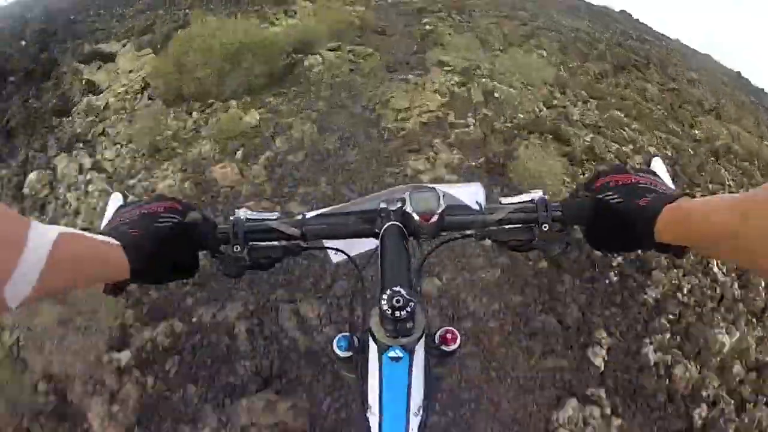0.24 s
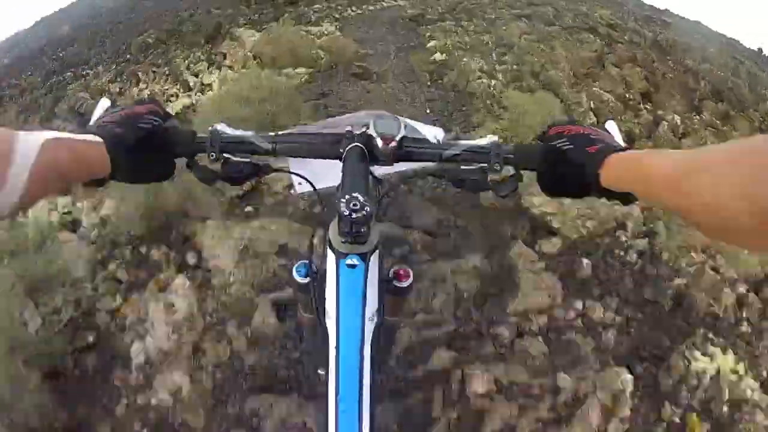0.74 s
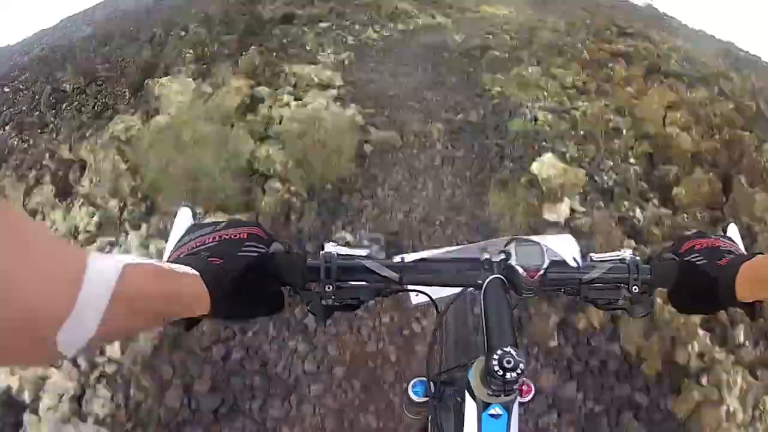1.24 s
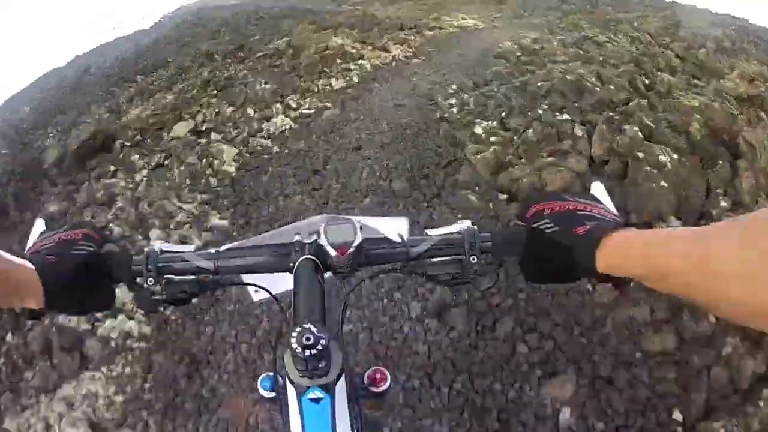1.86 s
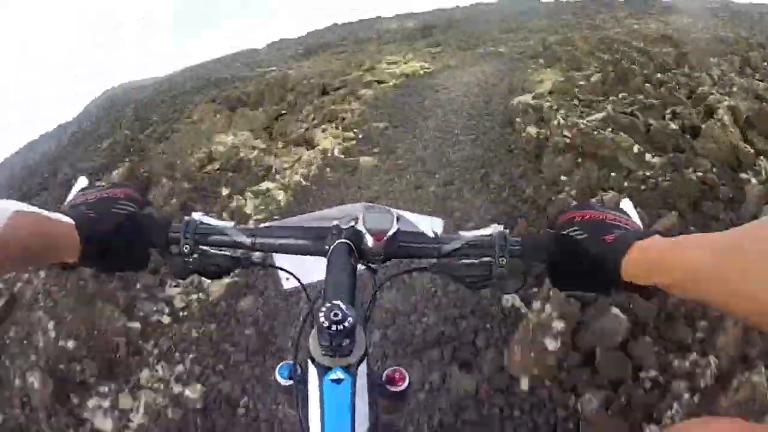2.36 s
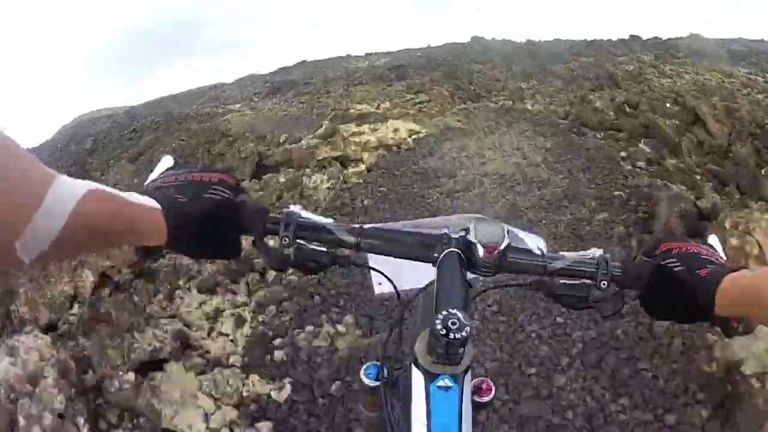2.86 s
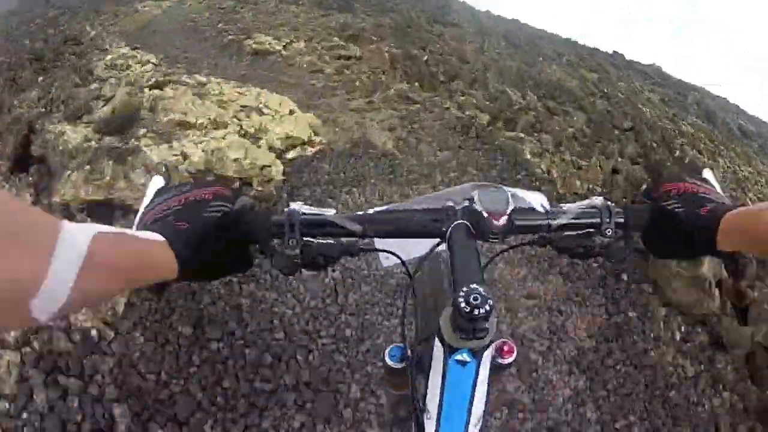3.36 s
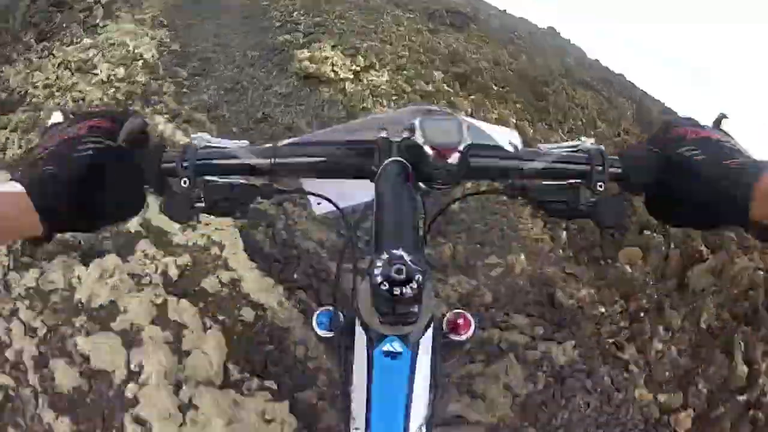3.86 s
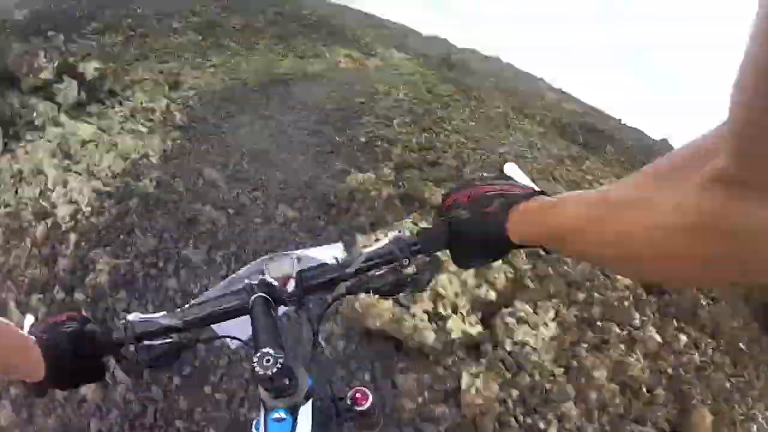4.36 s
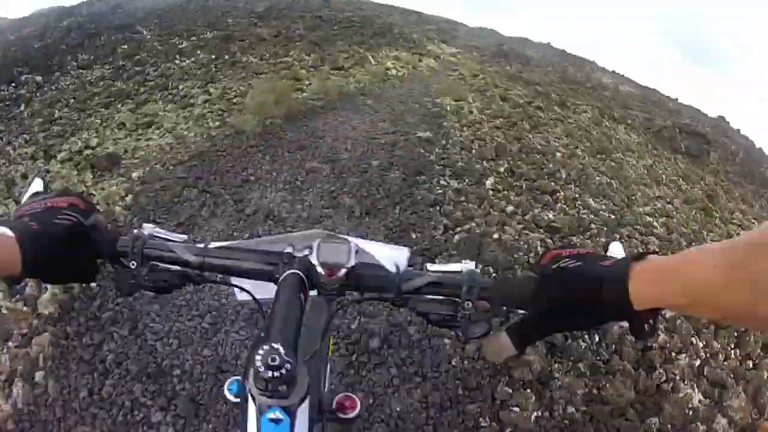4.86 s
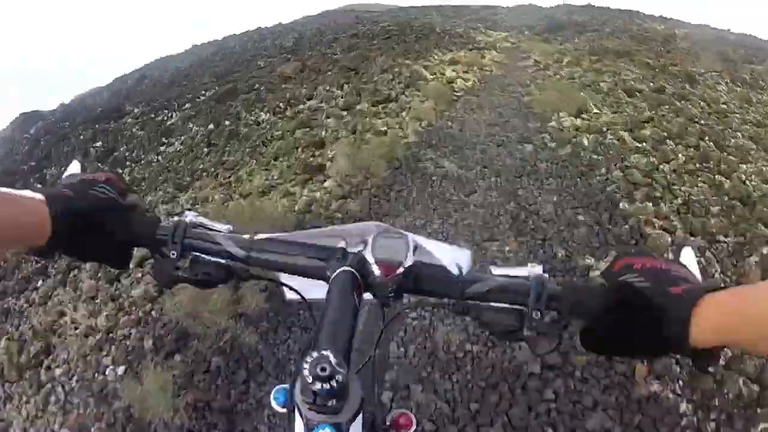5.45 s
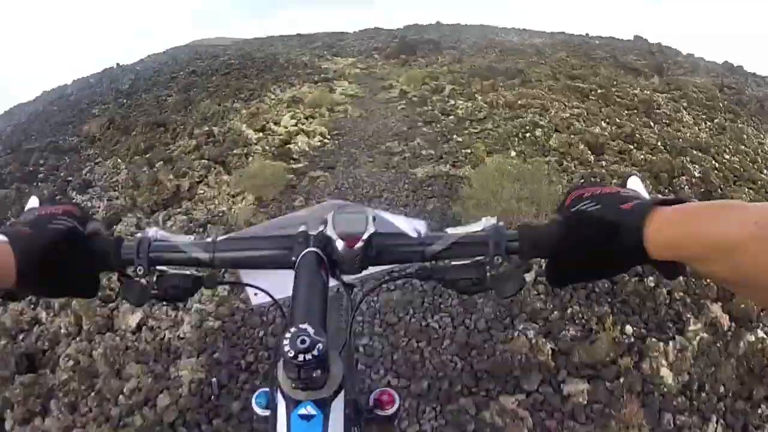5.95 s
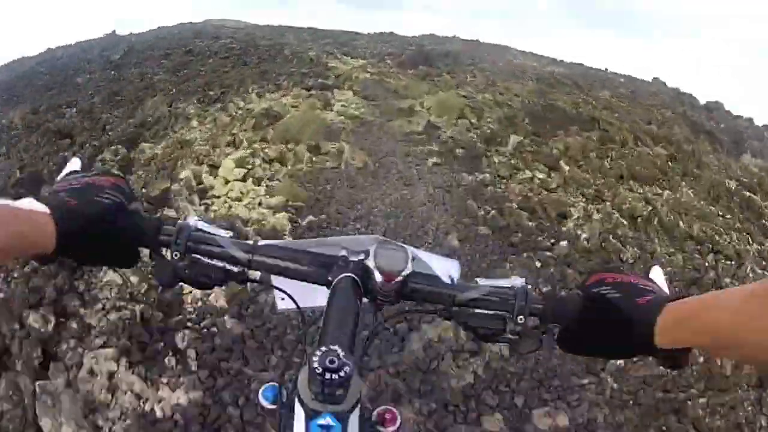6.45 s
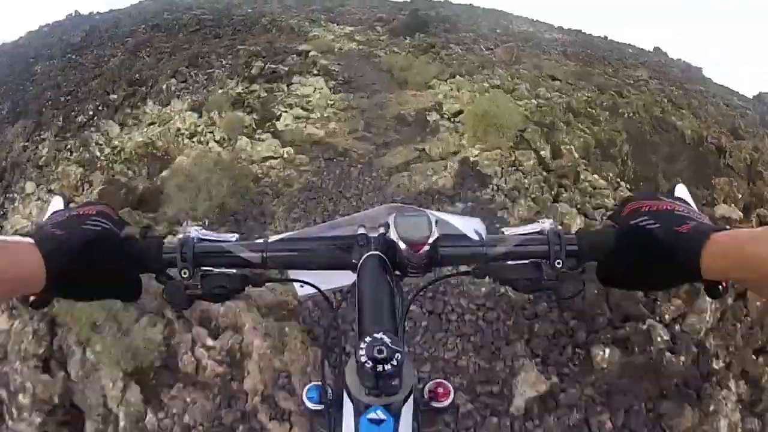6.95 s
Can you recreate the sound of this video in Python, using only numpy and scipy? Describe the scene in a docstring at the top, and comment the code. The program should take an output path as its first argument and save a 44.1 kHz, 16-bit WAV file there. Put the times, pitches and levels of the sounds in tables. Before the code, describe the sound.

A mountain bike runs over loose volcanic gravel, heard from inside a sealed camera case on the rider's chest. From the start a muffled, lumpy wind rumble buffets the microphone over faint grit and scattered knocks, with hard jolts near 0.3, 0.7 and 1.0 seconds. Between 1.0 and 1.7 a few dull thumps stand out, with fewer stones. From 1.75 the crunch brightens and clacks crowd together, with a very sharp crack at 2.0 and dense rattling until 2.5. Heavy wind and low thuds return around 2.6 to 3.2. After 3.5 the rumble turns patchier, exposing gritty scrabbling and chattering stones. Bright knocks cluster from 4.9 to 6.0, and more hard hits land around 6.6 to 6.9. The ride continues to the end at about 7.2 seconds, dry, boxy and coarse, with overloaded peaks.

```python
"""Mountain bike on loose gravel

A mountain bike rolls over loose lava gravel, heard by a cased camera strapped to the rider's chest.
Wind rumble is banded noise and jolts are short decaying sines; both can overload the input.
Crunching grit, scrabbling tyre knobs and knocking stones are noise bursts that ring the case's modes.
The recorder samples at 12 kHz and holds each sample, which mirrors the whole sound around 12 kHz."""
import sys
import numpy as np
from scipy import signal
from scipy.fft import rfft, irfft, next_fast_len
from scipy.io import wavfile
from scipy.ndimage import uniform_filter1d, minimum_filter1d

SR = 44100
rng = np.random.default_rng(int(sys.argv[2]) if len(sys.argv) > 2 else 0)


def dump_mix(stems):
    """Bounce the given channels to the path in sys.argv[1] as a 16-bit WAV at rate SR."""
    frames = np.atleast_2d(stems).T  # one column per channel
    limited = np.clip(frames, -1, 1)  # hard clip at full scale
    pcm = np.round(limited * 32767).astype(np.int16)
    wavfile.write(sys.argv[1], SR, pcm)


N = 317512


def from_db(db):
    """Decibels to gain."""
    return 10 ** (np.asarray(db) / 20)


def rms_one(x):
    """Scale to rms 1."""
    return x / np.sqrt(np.mean(x ** 2) + 1e-20)


def in_time(rows):
    """Turn each level column of a time curve into one value a sample."""
    s, *columns = np.transpose(rows)
    return [np.interp(np.arange(N) / SR, s, c) for c in columns]


def double_lowpass(x, r):
    """Two equal one-pole low-passes in a row: an impulse swells, then dies away."""
    return signal.lfilter([1], [1, -2 * r, r * r], x)


def drift(rate_hz):
    """Slow random movement of rms 1: low-passed noise, drawn at every 20th sample."""
    r = np.exp(-2 * np.pi * rate_hz * 20 / SR)
    slow = double_lowpass(rng.standard_normal(N // 20 + 2002), r)[2000:]   # settled part only
    return np.interp(np.arange(N) / 20, np.arange(len(slow)), rms_one(slow))


def resonance(x, hz, width_hz):
    """A two-pole resonance with gain 1 on top."""
    r = np.exp(-np.pi * width_hz / SR)
    b = np.array([1, 0, -1]) * (1 - r * r) / 2
    a = [1, -2 * r * np.cos(2 * np.pi * hz / SR), r * r]
    return signal.lfilter(b, a, x + 1e-18)


def mode_column():
    """The case's mode frequencies in Hz, one row a mode."""
    return np.array(CASE)[:, :1]


# wind on the case: t/s, relative level/dB of the bands below 288 Hz, of the bands above
WIND_LEVELS = [(0.0, -18, -23), (0.04, -8, -20.5), (0.12, -15.5, -23), (0.26, -7.5, -20),
               (0.3, -20.5, -22.5), (0.4, -18, -20.5), (0.56, -25, -28), (0.6, -7.5, -18.5),
               (0.82, -9.5, -17.5), (0.94, -4, -10), (0.96, -14.5, -21.5), (1.58, -7, -16.5),
               (1.7, -15.5, -26.5), (1.8, -14, -21), (2.09, -16.5, -22), (2.63, -7, -18.5),
               (2.73, -13, -19.5), (2.77, -5.5, -18), (3.15, -10, -20), (3.19, -9.5, -23), (3.55, -8, -16),
               (3.95, -22, -28), (4.01, -14, -22), (4.31, -21.5, -25), (4.39, -19, -20), (4.45, -25, -23),
               (4.71, -16, -23), (4.89, -27.5, -25), (5.07, -11.5, -20.5), (5.19, -30, -26.5),
               (5.65, -14.5, -23.5), (6.19, -23.5, -27), (6.28, -13.5, -24), (6.78, -20, -21.5),
               (6.86, -19, -25), (6.9, -15, -22), (6.94, -16.5, -22.5), (7.2, -23, -21)]
# spectrum of the wind noise: f/Hz, relative density level/dB (per Hz)
WIND_SPECTRUM = [(12, -38), (20, -10.5), (71, 0.5), (134, -2), (237, -7.5), (288, -5), (528, -16),
                 (675, -14), (1000, -28.5), (1300, -63), (2200, -120)]
SPLIT_HZ = 250   # a band that starts at or above this is upper rumble
RUMBLE_CUT_HZ = 777


def rumble(lumps_db, patchy_db, bumps_per_s, bumps_db, gust_tilt):
    """Wind pressure as third-octave noise and bumps: lumps swell all bands, each also flickers alone."""
    level_db, upper_db = in_time(WIND_LEVELS)
    hz, density_db = np.transpose(WIND_SPECTRUM)
    bumps = rms_one(rng.standard_normal(N + SR) * (rng.random(N + SR) < bumps_per_s / SR))
    source = rng.standard_normal((2, N + SR)) + from_db(bumps_db) * bumps
    lumps = drift(18.4)
    low_part, upper_part = np.zeros((2, N))
    edges = 18 * 2 ** (np.arange(18) / 3)
    for k, (low, high) in enumerate(zip(edges, edges[1:])):
        bandpass = signal.butter(3, [low, high], "band", fs=SR, output="sos")
        band = signal.sosfilt(bandpass, source[k % 2])[SR:]   # neighbouring bands use separate noise
        band_db = np.interp(np.log(low * high) / 2, np.log(hz), density_db)
        if low >= SPLIT_HZ:   # strong gusts weigh the upper rumble towards its low end
            band_db = band_db - gust_tilt * (level_db - level_db.mean()) * np.log2(low / 400)
        part = upper_part if low >= SPLIT_HZ else low_part
        part += band * from_db(band_db + lumps_db * lumps + patchy_db * drift(4.5))
    # the sealed case passes little above the cut
    sealed = signal.sosfilt(signal.butter(4, RUMBLE_CUT_HZ, fs=SR, output="sos"), upper_part)
    return from_db(level_db) * rms_one(low_part) + from_db(upper_db) * rms_one(sealed)


# gravel under the tyres: t/s, relative level/dB at 3 kHz, brightness (dB per octave)
GRAVEL = [(0, -33.5, -4), (.36, -37, -2.5), (.56, -30, -0.5), (1.04, -33, 0), (1.3, -36.5, -5.5),
          (1.8, -35.5, 0), (1.84, -28, 1), (2.2, -25.5, 1), (2.51, -25.5, 0), (2.55, -32.5, -2),
          (2.92, -30.5, -1), (2.96, -24.5, -1), (3.25, -31, 5.5), (3.4, -31.5, 1), (3.58, -29.5, 4),
          (3.62, -30, 1), (3.81, -31, 6), (3.89, -40, 3), (4.07, -33.5, -1), (4.11, -40.5, -3.5),
          (4.3, -33.5, -4), (4.33, -28.5, 1.5), (4.85, -31, -3.5), (4.97, -37, 1), (5.01, -26, 1.5),
          (5.17, -30, -1.5), (5.37, -35, 0), (5.43, -30.5, 0.5), (5.49, -38, 4), (5.57, -29, -2),
          (5.79, -34, 2), (5.85, -29, 3.5), (6.4, -40, -3), (6.42, -30.5, 5), (6.5, -35, -0.5),
          (6.78, -28, -3), (6.97, -33.5, 2), (6.99, -32.5, 0), (7.2, -34, -1)]


def crunch(per_s, spread_db, crack_s, clump_db, hiss_db, focus_octaves):
    """Grit cracks clump over a faint hiss; each has its own pitch and favours the modes near it."""
    level_db, bright_db = in_time(GRAVEL)
    octave = np.log2(mode_column() / 3000)
    at = np.flatnonzero(rng.random(N) < per_s / SR)
    sizes = from_db(spread_db * np.minimum(rng.exponential(1, N), 3))[at]
    pitch = rng.uniform(octave.min(), octave.max(), N)[at]   # octaves from 3 kHz
    cracks = np.zeros((len(CASE), N))
    cracks[:, at] = sizes * np.exp(-.5 * ((octave - pitch) / focus_octaves) ** 2)
    swells = double_lowpass(cracks + 1e-18, np.exp(-1 / (crack_s * SR)))
    clumps = from_db(clump_db * drift(35.0) + 2.9 * drift(3.4))
    envelope = rms_one(swells * clumps) + from_db(hiss_db)
    return from_db(level_db + bright_db * octave) * envelope * rng.standard_normal((len(CASE), N))


def scrabble(level_db, per_s, tilt_db):
    """Tyre knobs scrabble without pause: fine random clicks into every mode of the case."""
    clicks = rng.standard_normal((len(CASE), N)) * (rng.random(N) < per_s / SR)
    tilt = tilt_db * np.log2(mode_column() / 3000)   # dB per octave
    return from_db(level_db + tilt + 2.1 * drift(19.0)) * rms_one(clicks)


# modes of the case: f/Hz, width of the narrower of two resonances (Hz), relative level/dB
CASE = [(1060, 162, 2), (1420, 1250, -18), (1844, 440, -1.5), (2280, 300, -3.5), (2837, 394, 2),
        (3735, 490, -1), (4503, 750, 1.5), (4810, 610, 0.5)]


def ring_case(drive):
    """Each mode rings its own drive through a narrow and a wide resonance at one frequency."""
    ringing = np.zeros(N)
    for x, (hz, width_hz, db) in zip(drive, CASE):
        narrow = resonance(x, hz, width_hz)
        ringing += from_db(db) * resonance(narrow, hz, 3.9 * width_hz)
    return ringing


# stones and mount knocking: t/s, relative level/dB, brightest f/Hz,
# time for the chatter to fall 30 dB (s), relative low body level/dB
KNOCKS = [(0.0432, -11.5, 4650, 0.011, -24), (0.153, -15.5, 1990, 0.016, -12),
          (0.217, -14.5, 1090, 0.013, -10), (0.282, -18, 2660, 0.016, -6), (0.3299, -5.5, 2210, 0.0092, -6),
          (0.4, -16.5, 5040, 0.02, -16), (0.41, -8.5, 4500, 0.0072, -24), (0.454, -16, 1170, 0.016, -7),
          (0.468, -9, 3070, 0.013, -27), (0.5112, -19, 1550, 0.0088, 4), (0.5547, -13, 3870, 0.023, -17),
          (0.579, -13.5, 3010, 0.014, -17), (0.6468, -12.5, 1820, 0.012, -20),
          (0.759, -10, 1330, 0.0082, -5), (0.81, -17, 4400, 0.01, -20), (0.837, -3.5, 1800, 0.009, -18),
          (0.859, -22, 1370, 0.0093, 11), (0.9726, -3, 1000, 0.0057, -7), (1, -14.5, 3050, 0.02, -15),
          (1.028, -19.5, 2880, 0.021, -15), (1.043, -13, 2300, 0.0097, -21),
          (1.318, -9.5, 1610, 0.0085, -3), (1.356, -16.5, 1050, 0.0082, 7),
          (1.549, -16.5, 2920, 0.016, -12), (1.715, -19.5, 4630, 0.019, -15),
          (1.7554, -5.5, 4970, 0.011, -15.5), (1.787, -12, 1060, 0.0091, -26),
          (1.8285, -5, 2800, 0.011, -17), (1.8357, -8, 3000, 0.019, -10), (1.871, -4, 3760, 0.0057, -22),
          (1.91, -17, 3260, 0.022, -18), (1.921, -13, 3000, 0.023, -19), (1.9777, -13, 2920, 0.015, -20),
          (2.0075, 7.5, 4140, 0.0052, -21), (2.0687, -19.5, 3730, 0.064, -9),
          (2.139, -7, 4370, 0.0095, -20), (2.17, -10.5, 3620, 0.018, -14), (2.1906, -12, 4500, 0.024, -14),
          (2.2132, -9, 4620, 0.01, -22), (2.2762, -16, 2030, 0.021, -11), (2.3107, -7, 3760, 0.012, -11),
          (2.363, -6, 3180, 0.008, -17), (2.407, -14, 2900, 0.012, -15), (2.4432, -13.5, 2840, 0.025, -14),
          (2.499, -6, 5070, 0.021, -15), (2.728, -14.5, 1390, 0.0076, 3), (2.9896, -9.5, 2890, 0.012, -4),
          (3.0609, -19, 1140, 0.0075, 8), (3.0833, -13, 1040, 0.0093, -6.5), (3.128, -12, 4800, 0.012, -22),
          (3.1455, -13, 2470, 0.035, -13), (3.2291, -2, 1020, 0.0084, -10), (3.342, -12, 4500, 0.016, -16),
          (3.3635, -8.5, 2380, 0.011, -14), (3.42, -16, 4470, 0.013, -6), (3.512, -15, 1120, 0.015, -2.5),
          (3.618, -6.5, 4770, 0.0083, -11), (3.69, -18, 3900, 0.0091, -13), (3.7087, -12, 4750, 0.011, -6),
          (3.746, -10, 4830, 0.021, -22), (3.7978, -13, 2500, 0.021, -24), (3.814, -12.5, 4700, 0.015, -25),
          (3.863, -15, 3000, 0.0092, -21), (3.9379, -25, 1140, 0.0093, 5), (4.0265, -19, 1100, 0.012, -8),
          (4.0733, -22, 4200, 0.0085, -18), (4.0856, -6, 3640, 0.0091, -21), (4.1375, -13, 2330, 0.016, -6),
          (4.152, -6, 3400, 0.011, -16), (4.3131, -20.5, 2950, 0.039, -8), (4.34, -16, 1780, 0.028, -8),
          (4.395, -17, 4520, 0.029, -9), (4.4497, -12, 2690, 0.0088, -9), (4.4845, -19, 1890, 0.039, -3),
          (4.503, -21, 3030, 0.0072, -8), (4.6317, -17, 1770, 0.019, -16), (4.722, -9.5, 1050, 0.014, -10),
          (4.794, -16, 4550, 0.013, -20), (4.836, -15, 2980, 0.01, -22), (4.877, 0.5, 3740, 0.0049, -7),
          (4.9464, -15, 2960, 0.012, -23), (5.017, -10, 2940, 0.0097, -22), (5.124, -17, 4580, 0.016, -16),
          (5.1398, -1, 4350, 0.0081, -18), (5.229, -4.5, 4650, 0.0079, -19),
          (5.257, -2.5, 4550, 0.0057, -28), (5.32, -4.5, 2320, 0.01, -30), (5.441, -12, 3660, 0.01, -28),
          (5.514, -10.5, 3440, 0.022, -20), (5.5265, -8.5, 2420, 0.019, -18),
          (5.5764, -6.5, 4300, 0.0079, -11), (5.633, -10, 4580, 0.0093, -6),
          (5.673, -7.5, 1000, 0.014, -18), (5.6808, -9, 4770, 0.014, -7.5),
          (5.847, -13.5, 3030, 0.014, -11), (5.8713, -10.5, 3060, 0.013, -19),
          (5.905, -2, 4760, 0.0077, -12), (5.964, -6.5, 2450, 0.0084, -24), (5.998, -12, 4460, 0.009, -19),
          (6.0702, -17, 1700, 0.026, -2.5), (6.135, -13, 2800, 0.0061, -16), (6.1539, -26, 1130, 0.011, 3),
          (6.1684, -9, 5000, 0.0097, -30), (6.1988, -16, 4780, 0.01, -10), (6.251, -18.5, 1170, 0.028, -6),
          (6.4135, -18, 2970, 0.02, -10), (6.542, -11, 3770, 0.0074, -1), (6.571, -8, 2650, 0.024, -12),
          (6.6908, -6, 3000, 0.0089, -3.5), (6.7305, 0, 2000, 0.0045, -19), (6.76, -3.5, 2980, 0.014, -23),
          (6.8805, -17, 2760, 0.0065, -19), (6.893, 0, 2220, 0.0088, -12),
          (7.0233, -11.5, 4610, 0.011, -22), (7.0404, -18.5, 4910, 0.017, -13),
          (7.0749, -6, 3820, 0.015, -18)]
BODY_HZ = 1600   # modes below this carry a knock's low body


def knocks(focus_octaves, broad_db, uneven_db, rise_s, ragged_db, gain_db, body_gain_db):
    """A contact chatters raggedly: strong near its own pitch, uneven in the other modes."""
    out = np.zeros((len(CASE), N + SR))
    t = np.arange(SR // 16) / SR
    mode_hz = mode_column()
    chatter = rng.standard_normal((len(KNOCKS), len(CASE), len(t)))
    steps = rng.standard_normal((len(KNOCKS), len(t) // 40 + 1))
    bounces = from_db(ragged_db * np.repeat(steps, 40, axis=1))[:, :len(t)]   # about 1 ms each
    others = from_db(broad_db + uneven_db * rng.standard_normal((len(KNOCKS), len(CASE), 1)))
    for knock, noise, bounce, other in zip(KNOCKS, chatter, bounces, others):
        s, peak_db, hz, length_s, body_db = knock
        shape = (1 - np.exp(-t / rise_s)) * from_db(-30 * t / length_s) * bounce
        near = np.exp(-.5 * (np.log2(mode_hz / hz) / focus_octaves) ** 2)
        share = np.where(mode_hz < BODY_HZ, from_db(body_db + body_gain_db), near + other)
        out[:, round(s * SR):][:, :len(t)] += from_db(peak_db + gain_db) * share * shape * noise
    return out[:, :N]


def mount_thud(body, hz, width_hz, gain_db):
    """The chest mount answers a knock's low body with two resonances at one frequency."""
    return from_db(gain_db) * resonance(resonance(body, hz, width_hz), hz, 2 * width_hz)


# hard jolts of the case: t/s, relative level/dB, f/Hz
JOLTS = [(0.33, 1.5, 420), (0.719, 1.5, 197), (0.972, -4.5, 620), (1.044, -1.5, 610), (1.174, -9, 202),
         (1.24, -2, 323), (1.534, -1, 270), (1.812, -12, 470), (1.926, -6, 580), (2.006, -3.5, 210),
         (2.605, -25, 215), (2.853, 0, 220), (2.99, -2.5, 415), (3.15, -0.5, 485), (3.798, -15, 690),
         (3.851, -8, 250), (4.288, -12, 222), (4.485, -7, 410), (5.0, -7, 242), (5.525, -7, 408),
         (5.671, -6, 302), (6.254, -6, 221), (6.566, -0.5, 315), (6.69, -10.5, 300), (6.893, -7, 231)]


def jolts(cycles):
    """A short push swings the case as a sine that falls 60 dB in the given number of cycles."""
    out = np.zeros(N + SR)
    t = np.arange(SR // 20) / SR
    for s, peak_db, hz in JOLTS:
        envelope = from_db(-60 * t * hz / cycles) * (1 - np.exp(-t * hz * 10.6))
        out[round(s * SR):][:len(t)] += from_db(peak_db) * np.sin(2 * np.pi * hz * t) * envelope
    return out[:N]


def scene():
    """Scrabble, crunch and knocks ring the case, knocks thud in the mount; rumble and jolts lie under."""
    grit = crunch(per_s=1500.0, spread_db=0.5, crack_s=0.00085, clump_db=2.5, hiss_db=-13.5,
                  focus_octaves=0.34)
    blows = knocks(focus_octaves=0.21, broad_db=-4, uneven_db=5.5, rise_s=0.0047, ragged_db=0.5,
                   gain_db=8.0, body_gain_db=5)
    knobs = scrabble(level_db=-45, per_s=3000.0, tilt_db=-10.0)
    ringing = ring_case(from_db(3.5) * grit + blows + knobs)
    thud = mount_thud(blows[0], hz=710, width_hz=372, gain_db=11.5)   # driven by the lowest mode's share
    wind = rumble(lumps_db=2.5, patchy_db=1.5, bumps_per_s=60.0, bumps_db=-4.5, gust_tilt=0.11)
    return (wind + jolts(cycles=7.2) + ringing + thud)[None]


OVERLOAD = 1.0   # full scale
LIMITER_S = 0.012
HOLD_HZ, ALIAS_CUT_HZ, CUTOFF_HZ = 12000, 5300, 15250


def limit(dry):
    """A fast limiter looks ahead to each peak and turns it down smoothly."""
    size = round(LIMITER_S * SR)
    gain = minimum_filter1d(OVERLOAD / np.maximum(np.abs(dry), OVERLOAD), 2 * size + 1)
    return dry * uniform_filter1d(gain, size + 1)


def sample_and_hold(x):
    """Sampling adds images around the sample rate; holding each sample dulls them."""
    # the sound plus its first pair of images
    sampled = x * (1 + 2 * np.cos(2 * np.pi * HOLD_HZ * np.arange(N) / SR))
    size = next_fast_len(N)
    # a held step is a boxcar one sample period long
    hold = np.sinc(np.fft.rfftfreq(size, 1 / SR) / HOLD_HZ)
    return irfft(rfft(sampled, size) * hold, size)[:, :N]


def record(dry):
    """The limited input is filtered, sampled, held and clipped; the top is cut."""
    limited = from_db(2.0) * limit(dry)
    filtered = signal.sosfilt(signal.butter(8, ALIAS_CUT_HZ, fs=SR, output="sos"), limited)
    held = np.clip(sample_and_hold(filtered), -OVERLOAD, OVERLOAD)
    return signal.sosfilt(signal.ellip(10, .05, 60, CUTOFF_HZ, fs=SR, output="sos"), held)


dry = scene()
out = record(dry)
dump_mix(out)
```